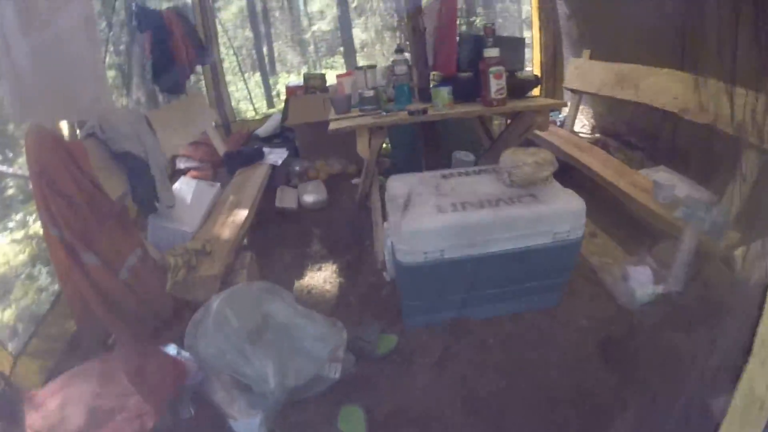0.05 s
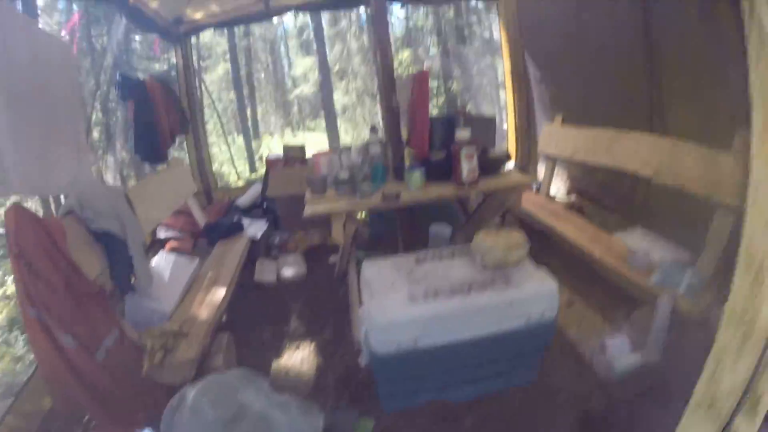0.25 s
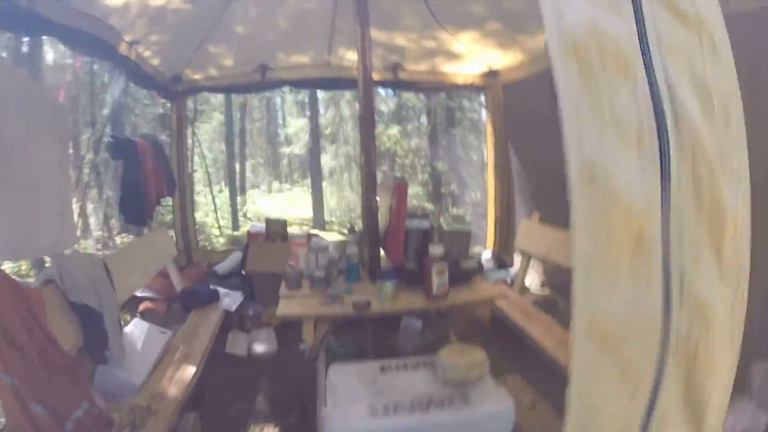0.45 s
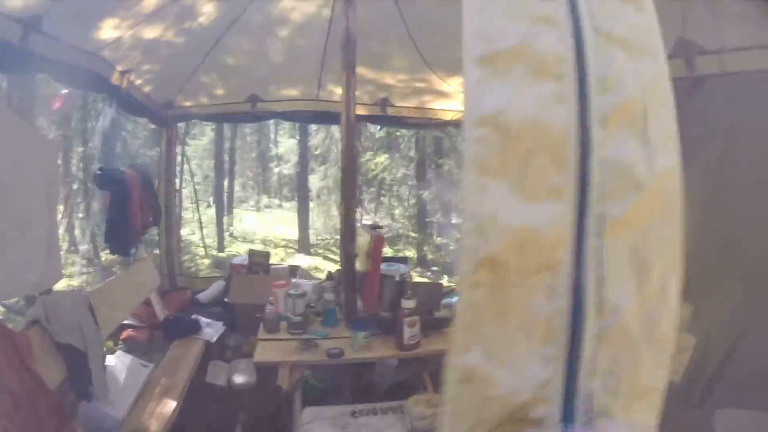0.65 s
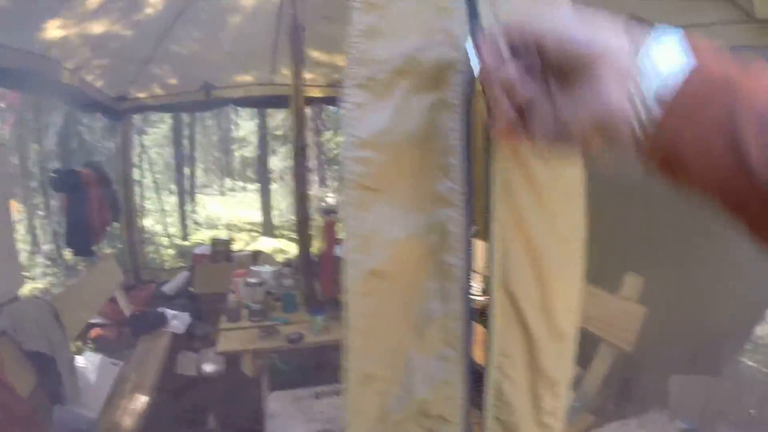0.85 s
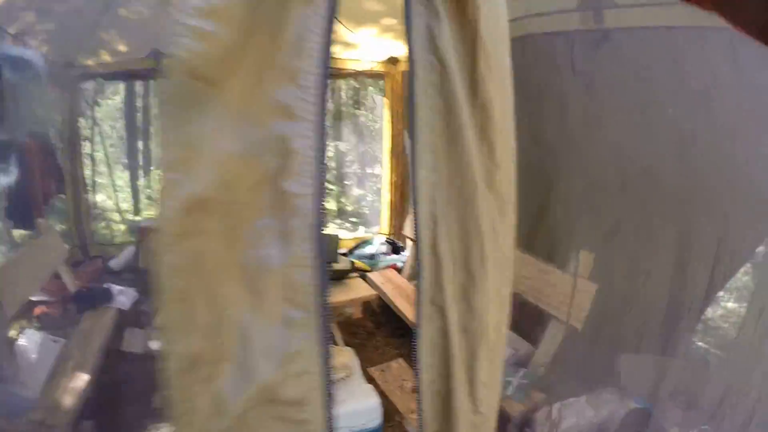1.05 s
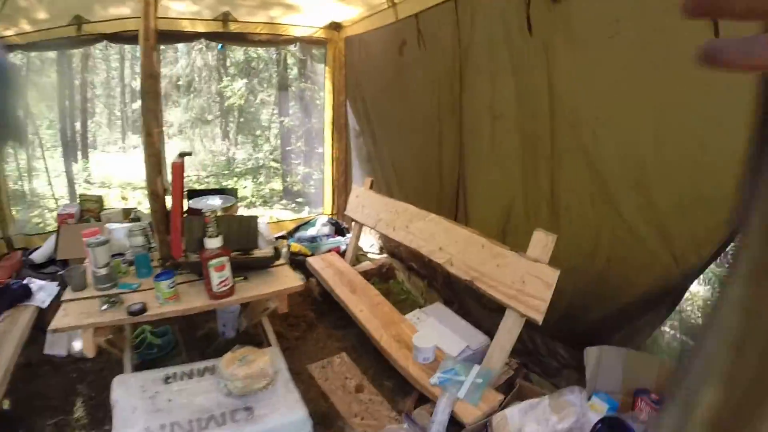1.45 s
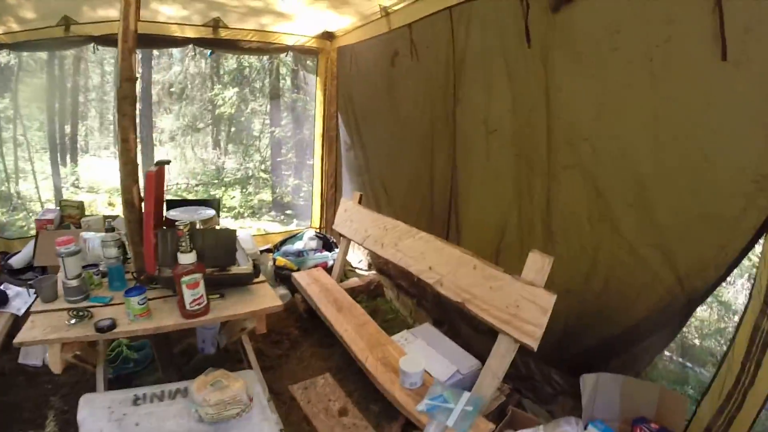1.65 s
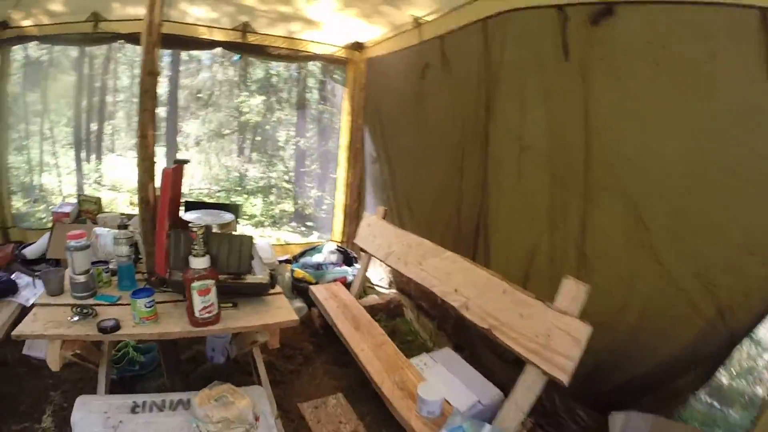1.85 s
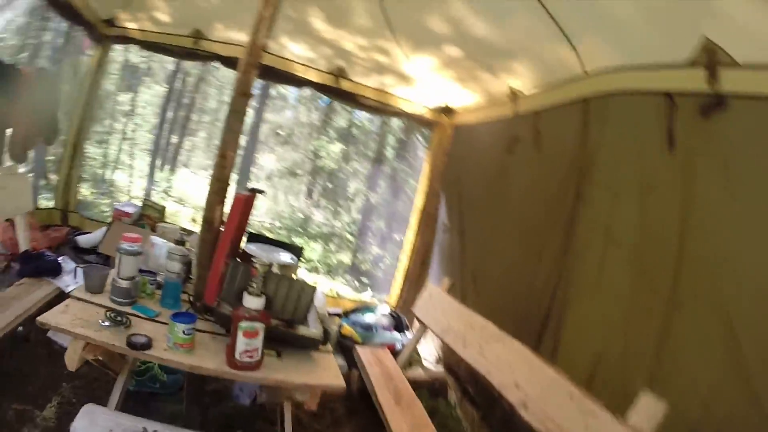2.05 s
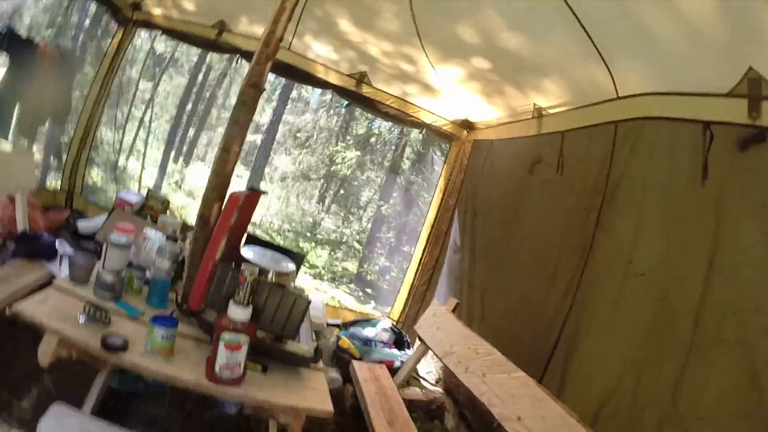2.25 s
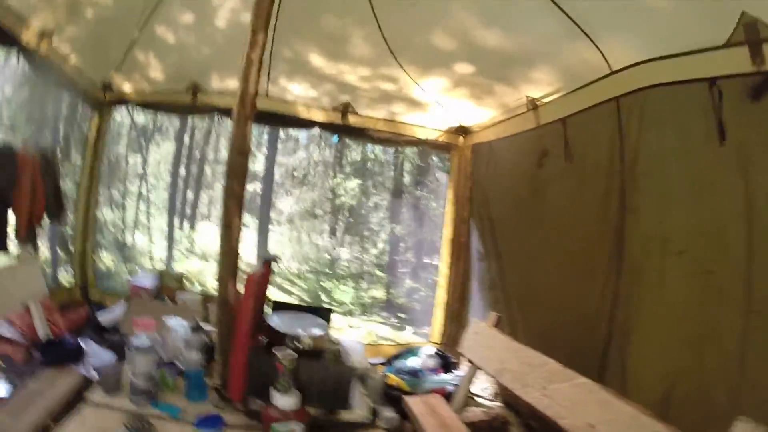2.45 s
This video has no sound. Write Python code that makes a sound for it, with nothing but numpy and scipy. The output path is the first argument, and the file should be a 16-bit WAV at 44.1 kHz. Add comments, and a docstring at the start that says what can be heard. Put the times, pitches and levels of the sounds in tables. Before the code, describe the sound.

A tent zipper is pulled open close by. Canvas crinkles and tugs tight first, then from about 0.2 to 1 second the coarse zipper buzzes, rising in pitch, snagging slightly and slowing at the end. The metal tab and teeth clink lightly until 1.3 seconds. The flap slides and rustles aside until about 1.7 seconds. A faint swish and one more clink come near 2.3 seconds, over a quiet forest hush.

```python
"""Canvas crinkles and tugs tight, then a coarse tent zipper buzzes open in one close stroke.
The slider knocks tooth after tooth and the taut canvas radiates the buzz; the metal pull tab jingles.
Then the flap is pushed aside and slides and crinkles away, over the hush of a forest camp."""
import sys
import numpy as np
from scipy import signal
from scipy.fft import rfft, irfft
from scipy.io import wavfile
from scipy.ndimage import uniform_filter1d

SR = 44100
rng = np.random.default_rng(int(sys.argv[2]) if len(sys.argv) > 2 else 0)


def wav_record(signal):
    """Record a signal, one row per channel, as 16-bit PCM in the file named by sys.argv[1]."""
    frames = np.transpose(np.atleast_2d(signal))
    bounded = np.clip(frames, -1, 1)
    # unit amplitude maps onto the largest positive 16-bit level
    quanta = np.round(bounded * 32767).astype(np.int16)
    wavfile.write(sys.argv[1], SR, quanta)


N = 110250
T = np.arange(N) / SR

# The pace of the pull. Each row: time in seconds, teeth per second.
SLIDER_SPEED = [(.2, 339.1), (.25, 392.1), (.28, 530.2), (.335, 623.8), (.385, 719), (.44, 755),
                (.475, 733), (.53, 754.4), (.66, 665.4), (.72, 701.8), (.755, 676), (.795, 698.9),
                (.83, 678), (.857, 694), (.905, 666.4), (.95, 585.2), (1.0, 386.7)]
# Faders for the stroke. Each row: time in seconds, then buzz, rattle, hiss and panel levels in dB.
STROKE_LEVELS = [(.185, -48, -58, -68, -54), (.245, -38.5, -44.5, -59, -29.5),
                 (.31, -38.5, -47, -52.5, -44), (.4, -34, -38, -48, -39), (.448, -35, -38.5, -47.5, -48),
                 (.55, -32.5, -41, -48.5, -35), (.64, -31, -37.5, -47, -29.5),
                 (.785, -29, -44.5, -48.5, -24), (.85, -27.5, -46.5, -56, -35),
                 (.92, -31.5, -46.5, -51.5, -37), (.995, -38.5, -49, -53, -37.5),
                 (1.02, -50.5, -64, -55, -62), (1.07, -61, -59, -69, -60)]
# Throaty canvas, bright teeth, thin friction, dull snags. Each row: frequency in Hz, relative gain in dB.
BUZZ_EQ = [(100, -24.5), (280, -7), (540, -6.5), (720, 2.5), (1000, -1.5), (1480, -10.5), (2100, -5),
           (2350, -26), (3200, -28), (6000, -45)]
RATTLE_EQ = [(1200, -39), (2300, -20.5), (2750, -9.5), (3250, -3.5), (3700, -16.5), (4500, -18),
             (12000, -55.5)]
FRICTION_EQ = [(2500, -33), (4500, 0), (5650, 8), (7100, 2), (9100, 2.5), (11000, -14), (13500, -13),
               (16000, -39)]
SNAG_EQ = [(200, -39), (700, -1), (1330, 1.5), (1550, 2), (5000, -54), (15000, -53)]
# The slider snags and jolts the canvas. Each row: start in seconds, level in dB, decay in seconds.
SNAGS = [(.133, -22.5, 0.0044), (.153, -22, 0.0028), (.505, -18, 0.0036), (.846, -17, 0.0022)]
def zipper():
    """Tooth clicks and the scrape between them drive the canvas, the tooth rows and the slider."""
    speed = curve(SLIDER_SPEED)
    buzz_db, rattle_db, hiss_db, panel_db = (curve(STROKE_LEVELS, column) for column in (1, 2, 3, 4))
    phase = np.cumsum(speed * (1 + .033 * wander(110))) / SR  # counts teeth passed
    clicks = teeth(phase)
    scrape = unit(rng.standard_normal(N) * np.exp(-(phase % 1)))
    slack = undb(-4.5 + 13 * bump(.53, width_s=.17))  # the tape slackens mid-stroke and scrapes more
    drive = seams((clicks + slack * scrape) / np.hypot(1, slack))
    drive *= undb(1.8 * wander(170))  # judder
    buzz = colour(drive * undb(buzz_db), BUZZ_EQ) + panel(drive * undb(panel_db))
    # The tape thrums at the tooth rate when slow, and its overtones glide with the slider.
    slowness = (speed.max() - speed) / np.ptp(speed)
    fundamental = undb(7) * slowness * np.sin(2 * np.pi * phase)
    overtones = undb(-3) * sum(np.sin(2 * np.pi * k * phase) for k in (3, 4))
    thrum = (fundamental + overtones) * undb(rattle_db + 2 * wander(79))
    rattle = colour(unit(clicks + undb(1.5) * scrape) * undb(rattle_db + 2 * wander(52)), RATTLE_EQ)
    hiss = colour(unit(scrape + .5 * clicks) * undb(hiss_db + 2 * wander(54)), FRICTION_EQ)
    pulling = (T > STROKE_LEVELS[0][0]) & (T < STROKE_LEVELS[-1][0])
    return pulling * (buzz + thrum + rattle + hiss) + colour(bursts(SNAGS), SNAG_EQ)


def teeth(phase, jitter_teeth=.042, scatter_db=4):
    """The slider knocks out one click per tooth, each a little off in time and strength."""
    tooth = np.arange(1, int(phase[-1]))
    late, strength = rng.standard_normal((4096, 2))[tooth].T
    position = np.interp(tooth + jitter_teeth * late, phase, np.arange(N))
    gain = undb(scatter_db * np.minimum(strength, 1))
    taps = position.astype(int)[:, None] + np.arange(-7, 9)  # a short sinc lands between samples
    clicks = np.zeros(N)
    np.add.at(clicks, np.clip(taps, 0, N - 1), gain[:, None] * np.sinc(taps - position[:, None]))
    return unit(clicks / np.sqrt(np.gradient(phase)))  # equal power at any speed


def seams(knocks, lags_s=(.0011, .0019), echo=.5):
    """Each knock runs to and fro between the seams: smeared over a few ms, its colour unchanged."""
    spectrum = rfft(knocks)
    hz = np.arange(len(spectrum)) * SR / N
    for lag in lags_s:
        delay = np.exp(-2j * np.pi * hz * lag)
        spectrum = spectrum * (delay - echo) / (1 - echo * delay)
    return irfft(spectrum, N)


def panel(drive, low_hz=900, high_hz=1330):
    """The taut door panel rings in a broad, nasal band, with make-up gain for the narrowing."""
    band = signal.butter(2, [low_hz, high_hz], "bandpass", fs=SR, output="sos")
    return signal.sosfilt(band, drive) * np.sqrt(SR / 2 / (high_hz - low_hz))


# The tab swings against the slider. Each row: start in seconds, ring level in dB, click level in dB.
JINGLES = [(0.176, -37.5, -59), (1.022, -43.5, -58), (1.053, -46, -59), (1.142, -47, -56),
           (1.1798, -45, -35), (1.2858, -31.5, -27.5), (2.3627, -39.5, -28)]
def pull_tab(click_s=.00052, bounce_s=.0049, bounce_db=-5.5):
    """The metal tab clicks, rings and bounces once per swing, and briefly drags along the teeth."""
    click_eq = [(800, 1), (3300, -22), (7500, -9), (10000, 1), (15000, -16)]
    jingle = colour(bursts([(start, db, click_s) for start, _, db in JINGLES]), click_eq)
    for start, ring_db, _ in JINGLES:
        rebound = start + bounce_s * rng.uniform(.5, 1.5)
        for when, db in (start, ring_db), (rebound, ring_db + bounce_db):
            jingle += undb(db) * np.pad(tab_ring(), (int(when * SR), N))[:N]
    drag = fibres() * (np.abs(T - 1.175) < .04)
    graze = np.diff(tab_ring(), 2)  # light grazing favours the high modes
    return jingle + undb(-54) * signal.fftconvolve(drag, graze / np.linalg.norm(graze))[:N]


# The tab's tiny chime. Each row: frequency in Hz, level in dB, seconds to fall by 60 dB.
TAB_MODES = [(3340, -2, 0.023), (3960, -10, 0.066), (4030, -5, 0.071), (6640, -12.5, 0.11),
             (9190, -2, 0.062), (9900, -7, 0.021), (12600, -18, 0.066)]
def tab_ring(detune=.0073):
    """The struck tab rings in its modes; every touch detunes them a little differently."""
    age = T[:SR // 5]
    tunings = 1 + detune * rng.standard_normal(len(TAB_MODES))
    return sum(undb(db) * np.exp(-np.log(1000) * age / t60) * np.sin(2 * np.pi * hz * tuning * age)
               for (hz, db, t60), tuning in zip(TAB_MODES, tunings))


# Small, crisp ticks as the stroke ends and after it. Each row: start in seconds, level in dB.
TOOTH_TICKS = [(1.013, -34.5), (1.051, -34.5), (1.0983, -33), (1.134, -37.5), (1.2245, -34),
               (1.7233, -44.5), (1.8284, -41), (2.108, -43.5)]
def loose_teeth(decay_s=.0031):
    """Loose teeth touch, each contact a bright pinprick of noise."""
    tick_eq = [(1000, -51), (3300, 9), (4600, -10), (5750, 8),
               (6800, -3), (8200, -15), (10000, -1), (15000, -34)]
    return colour(bursts([(start, db, decay_s) for start, db in TOOTH_TICKS]), tick_eq)


# The door jerks tight or flaps. Each row: start in seconds, pitch in Hz, level in dB, decay in seconds.
TUGS = [(0.154, 57, -14, 0.0088), (0.5022, 244, -15.5, 0.0047), (0.5047, 328, -21.5, 0.01),
        (0.789, 1300, -4, 0.0013), (.792, 1398, -11, 0.003), (1.556, 352, -37.5, 0.0057),
        (1.583, 327, -41, 0.0057)]
def thumps():
    """A tug sets the cloth swinging for an instant."""
    return -sum(undb(db) * fade(start, decay_s) * np.sin(2 * np.pi * hz * (T - start))
                for start, hz, db, decay_s in TUGS)


# The canvas creases and snaps. Each row: start in seconds, level in dB, decay in seconds.
CREASES = [(.018, -36, 0.015), (.067, -30.5, 0.0071), (.095, -36, 0.0057), (1.0505, -28, 0.0023),
           (1.1262, -27, 0.0029), (1.177, -34, 0.0062), (1.2553, -29, 0.0022)]
# Faders for handling, cloth on cloth and pushed air. Each row: time in seconds, level in dB.
RUSTLE_LEVELS = [(0, -78), (.08, -46.5), (.115, -36.5), (.158, -27), (.172, -38.5), (.21, -40), (1.03, -45),
                 (1.09, -53.5), (1.15, -56), (1.175, -44), (1.27, -48), (1.52, -55), (1.585, -46.5),
                 (1.63, -58), (2.02, -62.5), (2.13, -52.5), (2.4, -67), (2.48, -53)]
SLIDE_LEVELS = [(.08, -70), (.155, -51.5), (1.08, -56), (1.27, -51), (1.33, -46.5), (1.41, -46),
                (1.45, -42), (1.49, -45.5), (1.66, -55), (2.08, -59), (2.45, -59.5)]
DRAUGHT_LEVELS = [(0, -79), (.9, -51), (1.28, -52), (1.45, -60.5)]
# Full rustle, papery slide, deep draught. Each row: frequency in Hz, relative gain in dB.
RUSTLE_EQ = [(100, -2.5), (400, -2), (1050, 4.5), (1500, -10.5), (2100, -11), (3200, -11.5), (5000, -17.5),
             (15000, -34)]
SLIDE_EQ = [(500, -20), (1200, -0.5), (2100, 8), (2700, -2.5), (3400, 8.5), (4800, 0.5), (6400, 0.5),
            (8500, -7), (11000, -14.5), (15000, -32)]
DRAUGHT_EQ = [(20, -4.5), (60, -5.5), (130, -7), (900, -33.5)]
def canvas_flap():
    """The flap rustles, slides, creases and pushes air; a light, high swish of cloth comes last."""
    handling = fibres() * undb(curve(RUSTLE_LEVELS) + 3 * wander(59))
    rustle = colour(handling + bursts(CREASES), RUSTLE_EQ)
    rubbing = unit(fibres() + rng.standard_normal(N))
    slide = colour(rubbing * undb(curve(SLIDE_LEVELS) + 1.46 * wander(63)), SLIDE_EQ)
    swish = colour(fibres() * undb(-57) * bump(2.33, width_s=.045), FRICTION_EQ)
    draught = colour(rng.standard_normal(N) * undb(curve(DRAUGHT_LEVELS)), DRAUGHT_EQ)
    return rustle + slide + swish + draught


def fibres(catches_per_s=5000, scatter_db=3.5):
    """Threads catch on each other in a dense crackle of tiny clicks."""
    catches = rng.random(N) < catches_per_s / SR
    polarity = rng.choice([-1, 1], N)
    strength = undb(scatter_db * np.minimum(rng.exponential(size=N), 5))
    return unit(catches * polarity * strength)


def forest_camp(level_db=-54.5):
    """The forest lays a faint, slowly swelling hush under everything."""
    hush_eq = [(30, -19), (328, 1), (662, -6), (1200, -1.5), (2900, -17), (5730, -23), (15000, -48)]
    swell_db = wander(3)
    return colour(rng.standard_normal(N), hush_eq) * undb(level_db + swell_db)


def undb(db):
    """Decibels to gain."""
    return 10 ** (np.asarray(db) / 20)


def unit(x):
    """Scale to rms 1."""
    return x / np.sqrt(np.mean(x ** 2))


def curve(table, column=1):
    """One column of a table, joined by straight lines in time."""
    rows = np.array(table)
    return np.interp(T, rows[:, 0], rows[:, column])


def colour(x, eq, size=4096):
    """Causal filter of unit power, shaped by (Hz, dB) points."""
    hz, db = np.array(eq).T
    bin_hz = np.arange(size // 2 + 1) * SR / size
    gain = undb(np.interp(np.log(bin_hz + 1), np.log(hz), db))
    cepstrum = irfft(np.log(gain))
    cepstrum[1:size // 2] *= 2  # folding to minimum phase keeps attacks sharp
    cepstrum[size // 2 + 1:] = 0
    ring = irfft(np.exp(rfft(cepstrum)))
    return signal.fftconvolve(x, ring / np.linalg.norm(ring))[:N]


def wander(rate_hz):
    """Smooth random drift of rms 1."""
    span = max(int(SR / rate_hz), 1)
    drift = uniform_filter1d(rng.standard_normal(N), span, mode="wrap")
    return unit(uniform_filter1d(drift, span, mode="wrap"))


def bump(centre_s, width_s):
    """A bell-shaped swell peaking at 1."""
    return np.exp(-((T - centre_s) / width_s) ** 2)


def fade(start, decay_s):
    """Fast attack, exponential tail."""
    age = np.maximum(T - start, 0)
    return (1 - np.exp(-age / (.23 * decay_s))) * np.exp(-age / decay_s)


def bursts(rows):
    """Short noisy contacts, one per row."""
    return rng.standard_normal(N) * sum(undb(db) * fade(start, decay_s) for start, db, decay_s in rows)


def scene():
    """Zipper, tab and canvas close by, the camp behind, in mono."""
    return (zipper() + pull_tab() + loose_teeth() + thumps() + canvas_flap() + forest_camp())[None]


def record(dry, top_hz=15300):
    """A steep low-pass shaves off the top of the treble."""
    return signal.sosfilt(signal.ellip(10, .2, 80, top_hz, fs=SR, output="sos"), dry)


dry = scene()
out = record(dry)
wav_record(out)
```